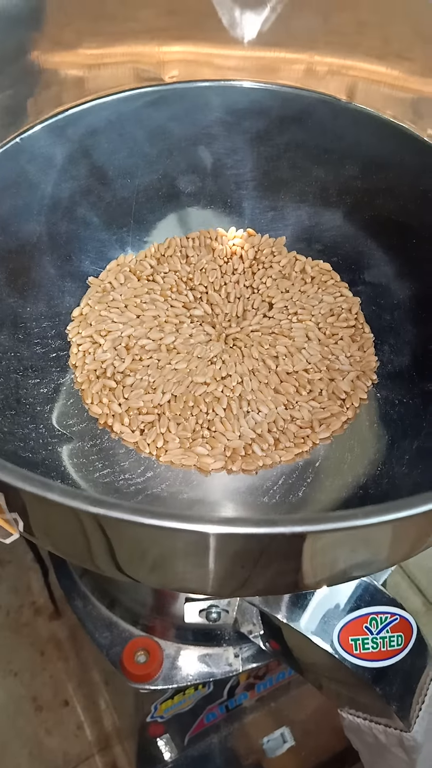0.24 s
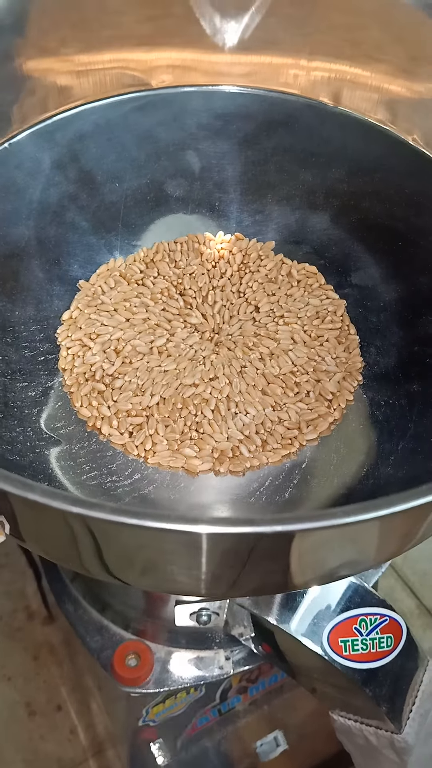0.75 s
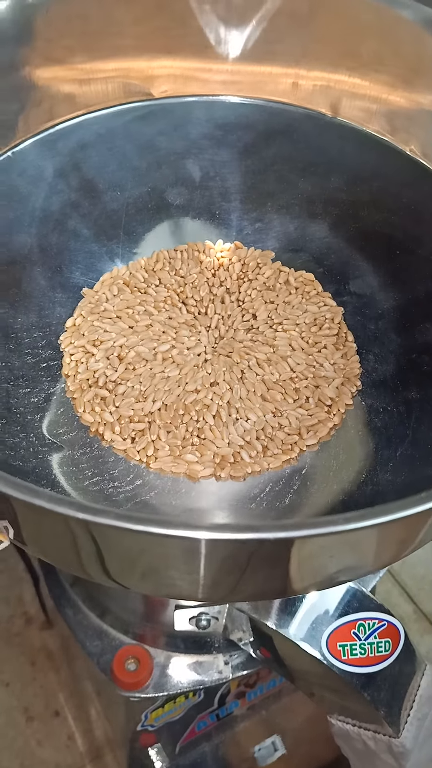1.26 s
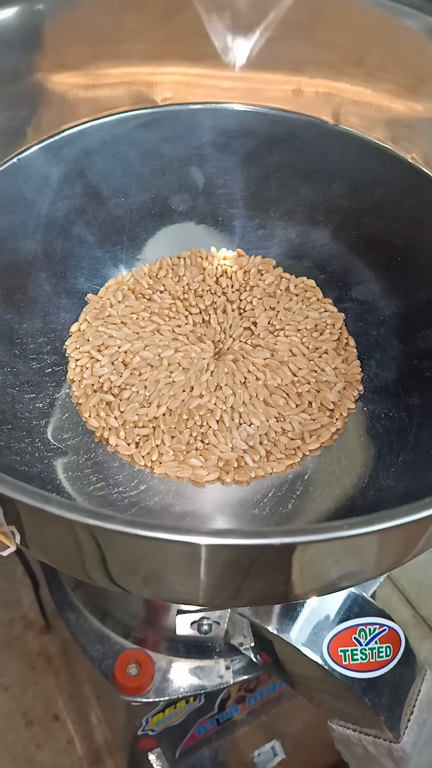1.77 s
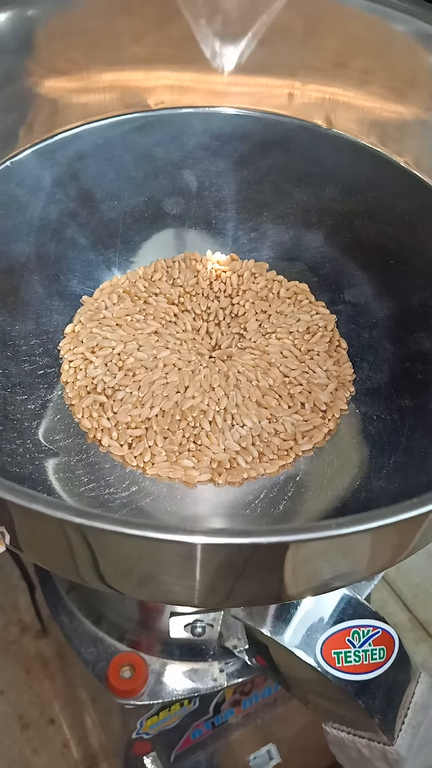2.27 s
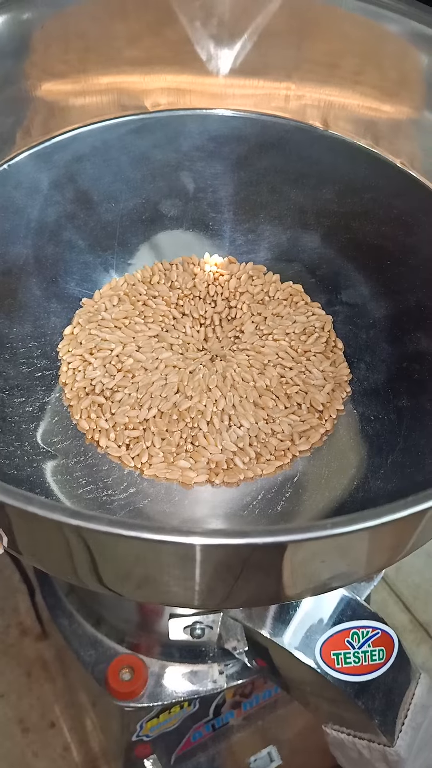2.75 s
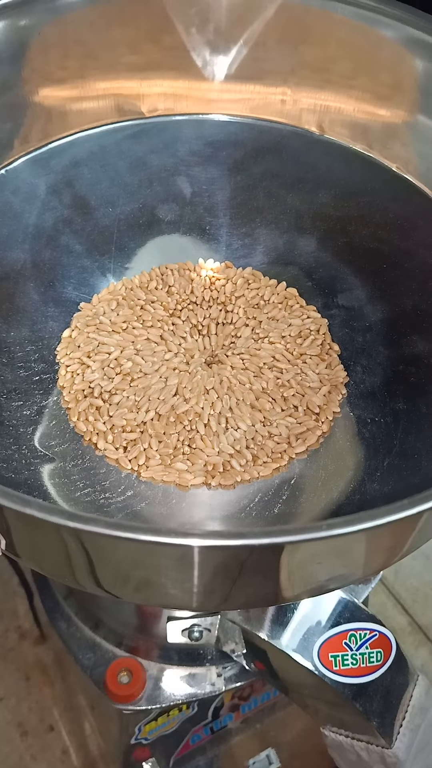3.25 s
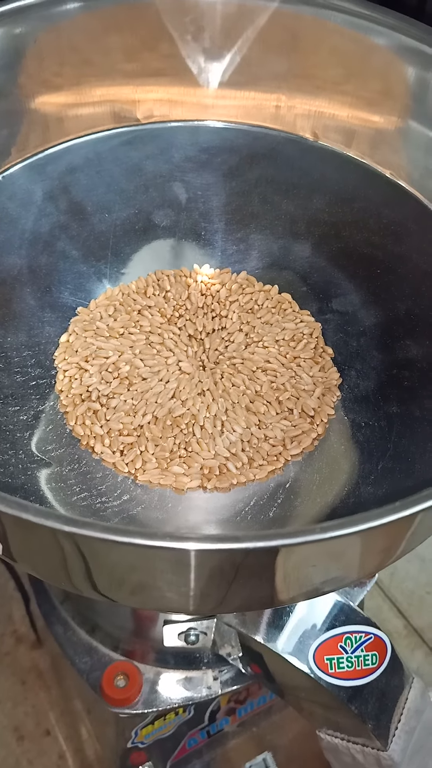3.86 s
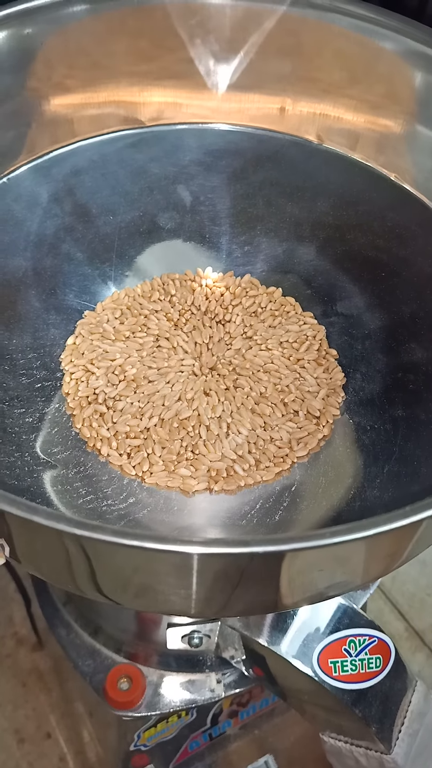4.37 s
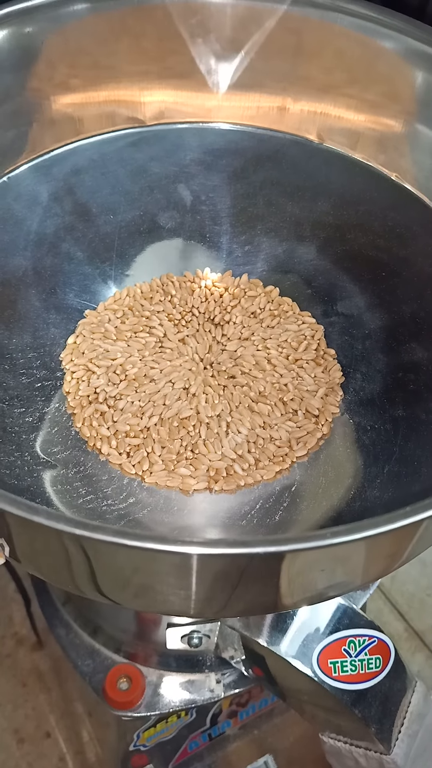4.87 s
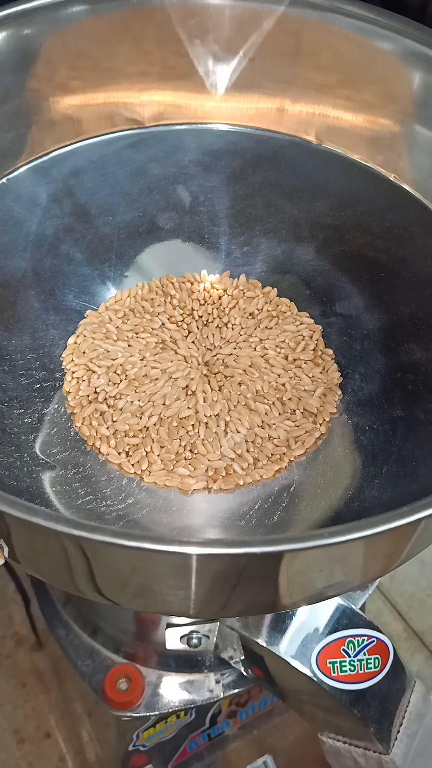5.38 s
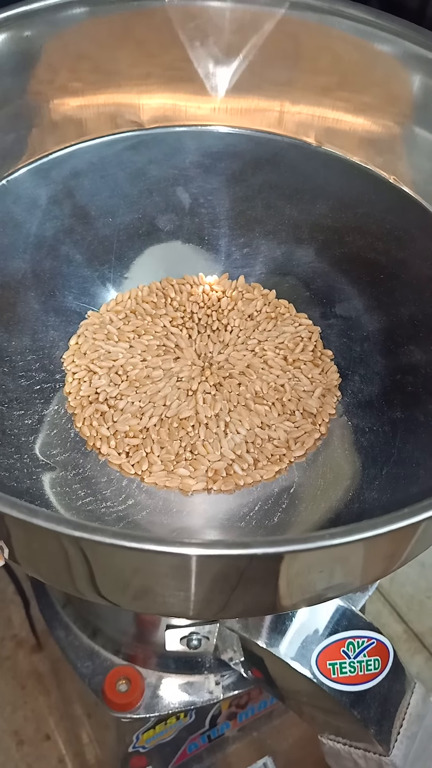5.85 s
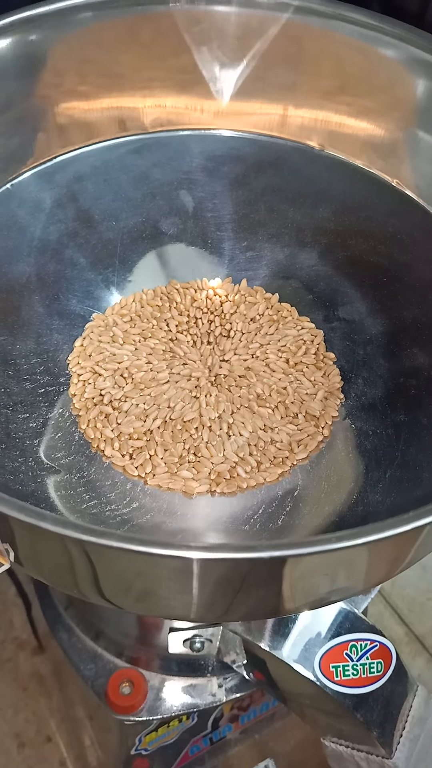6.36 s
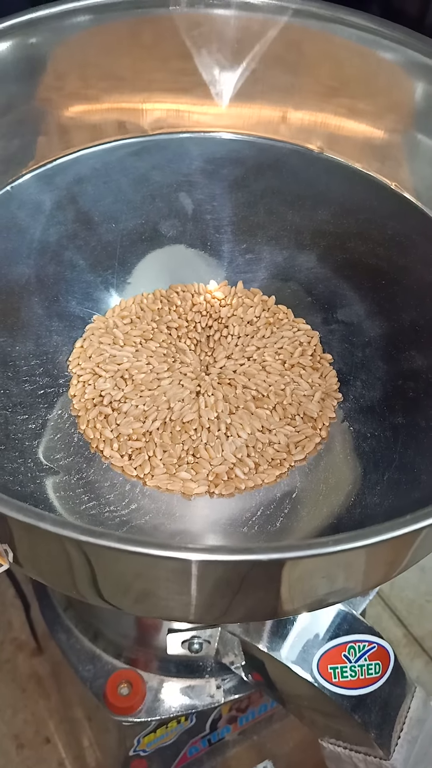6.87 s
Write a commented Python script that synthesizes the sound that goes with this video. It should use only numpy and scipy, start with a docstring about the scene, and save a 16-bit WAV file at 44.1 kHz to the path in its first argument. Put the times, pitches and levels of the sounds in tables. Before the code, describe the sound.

Continuous grinding of kernels in a small motorized flour mill, droning and hissing evenly with slight flutters and a few faint grainy ticks.

```python
"""Small electric grain mill indoors

A phone is held just over the steel hopper, and its two ports hear each resonance differently.
Kernels crush in a dense noise stream between the stones. The shaking excites resonances of the
grinding chamber (drone), the steel shell (whirr) and the hopper wall (hiss), over broad rubbing noise.
The grinding swells and dips briefly, the shell whines, and short grainy ticks sound in the hiss.
"""
import sys
import numpy as np
from scipy import signal
from scipy.fft import rfft, irfft, next_fast_len
from scipy.io import wavfile
from scipy.ndimage import uniform_filter1d, map_coordinates

SR = 44100
rng = np.random.default_rng(int(sys.argv[2]) if len(sys.argv) > 2 else 0)


def ratio_of_db(decibels):
    """Turn decibels (scalar or array-like) into linear amplitude factors; 0 dB maps to 1."""
    return 10 ** (np.asarray(decibels, float) / 20)


def put_to_file(sound):
    """Save the sound as 16-bit audio at rate SR, in the file named by the first command-line argument."""
    columns = np.atleast_2d(sound).T  # one column per channel
    safe = np.clip(columns, -1, 1)
    whole_steps = np.round(safe * 32767)
    wavfile.write(sys.argv[1], SR, whole_steps.astype(np.int16))


N = 314022  # samples

# resonances of the mill: pitch_hz, width_hz (between -6 dB points), left_db (relative power),
# right_minus_left_db, left_lead_rad
RESONANCES = [(294, 20, -53.5, 6.5, -1.5), (332.9, 22.2, -38, -1.5, -1.5), (379.6, 17, -42.5, -7, -2.5),
              (428.8, 13, -44, -10, -0.1), (450, 29, -38.5, -2.5, -2.5), (504.5, 41, -35.5, -4.5, -0.5),
              (558.8, 31, -32.5, -24, 1.07), (582.8, 28, -34.5, -4.5, -1.15), (607.6, 18, -42, -6, -1.5),
              (657, 33, -45, -13, -7.5), (798, 22, -51, -1, -3.5), (937, 35, -59.5, -1.5, 1.5),
              (1062, 28, -61, 3.5, 0.5), (1260, 43, -58.5, -0.5, 0.5), (1368, 64, -56, 3, 0),
              (1422, 30, -60.5, 0.5, -0.5), (1465, 26, -57, -3.5, -0.5), (1658, 49, -61.5, -10, -6),
              (1885, 36, -56, -2.5, 0.5), (2540, 50, -61, 2, -1.5), (2160, 80, -49, -2, 0.37),
              (2040, 110, -57.5, 2.5, 0), (2239, 60, -56.5, 2.5, -0.9), (2590, 62, -55.5, 1, -2.2),
              (2638, 24, -50.5, 12, 0.44), (2678, 30, -46.5, 0, 0.58), (2725, 40, -48, -3, .9),
              (2770, 60, -51.5, -6, 1.7), (3425, 60, -56, -2, 0), (3490, 45, -57, -6, 0),
              (3386, 46, -64.5, 7, 0.5), (3565, 60, -63.5, -1, -1), (3620, 50, -60, -0.5, -1.5),
              (3685, 40, -65.5, -1, -1.5), (4250, 150, -64, -3.5, 0), (4560, 440, -79, -3, 0),
              (5630, 180, -61.5, -9.5, 1), (6220, 410, -62, -7, -0.5), (7790, 400, -85, 8, 0.2)]
# broad rubbing noise under the resonances: pitch_hz, left_db (relative, per Hz), right_minus_left_db
RUBBING = [(78, -140, -0.5), (146, -102, 0), (196, -83.5, -5.5), (258, -71, -0.5), (404.4, -56, -10.5),
           (684, -74.5, 3.5), (765, -72.5, -0.5), (1344, -81, -3), (2070, -77, 5), (3240, -87.5, 6),
           (3980, -90.5, 1.5), (5240, -93, -4), (6520, -95, -1), (7050, -110, 6), (7800, -112, -9),
           (11000, -124, -4.5), (15500, -126, -1.5)]
# coherence of the two ports: pitch_hz, resonances_0_to_1, rubbing_0_to_1
COHERENCE = [(250, 0.98, 1), (630, 0.89, 0.99), (794, 1, 0), (2000, 0.75, 0.04), (3100, 0.89, 0.5),
             (4020, 0.98, 0.06), (6000, 0.5, 0), (7600, .3, 0), (8200, .3, 0.05)]
# how hard the stones are loaded, before each band's share: time_s, load_db
STONE_LOAD = [(0, 2.5), (.3, -0.56), (.9, -0.9), (1.5, 0.7), (2, 0.9), (2.7, -0.5), (3.1, 0.5), (3.6, -2.2),
              (4.3, 0.53), (5.1, 0), (5.6, -1.5), (6.1, -0.8), (6.5, -1.3), (6.85, -2), (7.12, -1.5)]
# brief changes of level, mostly swells, in the grinding noise: time_s, drone_db, whirr_db, hiss_db
BRIEF_SWELLS = [(.75, 1.5, 1.5, 2.7), (.898, 1, 1.9, 1.9), (1.0, 0, .8, 1.8), (1.098, -0.5, .1, 3),
                (1.291, 3, .1, 1.7), (1.851, 3, 1.3, .7), (1.936, 1.5, .1, 2.9), (2.16, 4.5, .1, 1.9),
                (2.345, 2.5, .1, 1.2), (2.43, -4, 2.3, .7), (2.719, 4.5, .8, 4.8), (2.76, 3, .3, 2),
                (2.81, 3.5, .7, 3), (2.89, 3.5, 0.091, 1.2), (3.18, 0.5, 3.5, 5), (4.18, .6, .1, 2.2),
                (4.32, 1.5, .1, 2.5), (4.455, 3, 0.82, 1.8), (4.88, 2.5, .9, 0.089), (5.203, 4.5, 1.7, 1.5),
                (5.322, 1.5, .1, 2.2), (5.832, 2, .1, 2.2), (6.489, 5.5, 0.55, 2.2), (6.59, 5, 3.8, .6)]
# brief changes of level, mostly dips, before each band's share: time_s, level_db, length_s
BRIEF_DIPS = [(0.059, -3, .06), (0.207, -1.5, .07), (0.813, -1.5, .06), (1.149, -3.5, 0.038),
              (1.231, -2.5, 0.046), (2.26, -1.5, 0.065), (2.945, -3.5, 0.097), (3.269, -2, .07),
              (4.54, -3, 0.066), (5.431, -1, 0.045), (5.772, 0.5, 0.034), (6.075, -1.5, 0.1),
              (6.71, -3, 0.1)]
# slow swelling of the shell's whine: time_s, swell_db
WHINE_SWELL = [(0, -4), (.75, -2), (.92, 2.5), (1.4, 4), (1.55, -0.5), (1.95, 1.5), (2.25, -2), (2.44, 0.5),
               (2.6, 0.5), (4.8, -0.4), (5.2, 0.3), (5.6, 0), (7.12, 1.5)]
# short grainy ticks in the hiss, some clear and some barely above the noise: start_s, level_db (relative)
HISS_TICKS = [(1.9343, -46.5), (2.6938, -46), (2.7137, -42.5), (2.8943, -45.5), (3.1752, -44),
              (5.2714, -46), (6.4906, -46.5)]

FFT_SIZE = next_fast_len(N)
HZ = np.maximum(np.arange(FFT_SIZE // 2 + 1) * SR / FFT_SIZE, 1)
SPLIT_HZ = (890, 3070, 8100)  # drone | whirr | hiss | faint air
PORT_LAG_S = 24 / SR  # delay from left port to right
LOW_LEAD_RAD, LOW_LEAD_HZ = 0.93, 670  # low rubbing reaches the right port earlier than the lag alone says
SHAFT_HZ, THROB_DB = 30.3, 0.6  # stone rotation, and its throb in the hiss
SWELL_RISE_S, SWELL_FALL_S = 0.02, 0.018
# how far drone, whirr and hiss follow the load and the dips
LOAD_SHARES, DIP_SHARES = (0.53, 0.42, 0.58), (1.1, 0.28, 0.7)
AIR_DRONE_SHARE, AIR_HISS_SHARE = 0.88, 0.5  # how far the faint air follows drone and hiss
WHINE_HZ, WHINE_WIDTH_HZ = 2617, 55
TICK_GAIN_DB, TICK_FADE_S = 68.5, 0.0097  # strength against the stream; time to fall to 1/e
ROOM_T60_S, ROOM_DB, ROOM_HZ = 0.095, -16, 920  # decay; echo energy before the low cut; low cut
PITCH_WAVER = 0.0015  # typical share by which the pitches drift
LEVEL_DB = -28.5  # rms of the dry mix over both ports, re full scale


def column(table, index):
    """Interpolation: one table column at every frequency, along a logarithmic frequency axis."""
    table = np.array(table, float)
    return np.interp(np.log(HZ), np.log(table[:, 0]), table[:, index])


def causal(power):
    """Minimum phase: folding the cepstrum gives a response that rings only after it is struck."""
    cepstrum = irfft(np.log(power + 1e-30) / 2)
    half = len(cepstrum) // 2
    cepstrum[1:half] *= 2
    cepstrum[half + 1:] = 0
    return np.exp(rfft(cepstrum))


def walk(rate):
    """Smoothed random process: levels held 1 / rate s and averaged twice, with unit spread."""
    hold = int(SR / rate)
    levels = np.repeat(rng.standard_normal(N // hold + 1), hold)
    smooth = uniform_filter1d(uniform_filter1d(levels, hold), hold)[:N]
    return smooth / smooth.std()


def bumps(t, times, heights_db, rise_s, fall_s):
    """Gaussian envelopes: brief swells or dips in dB around each time."""
    out = np.zeros(N)
    for at, db, rise, fall in np.broadcast(times, heights_db, rise_s, fall_s):
        out += db * np.exp(-((t - at) / np.where(t < at, rise, fall)) ** 2)
    return out


def ports(force, left, right, lead, coherence):
    """Partial coherence: the right port hears the left's stream later, mixed with an unrelated one."""
    coherence = np.clip(coherence, 0, 1)
    late = force[0] * np.exp(-1j * (2 * np.pi * HZ * PORT_LAG_S + lead))
    mixed = coherence * late + np.sqrt(1 - coherence ** 2) * force[1]
    response = causal(left)
    return np.array([response * force[0], response * np.sqrt(right / left) * mixed])


def crushing(crack_db, scatter_db):
    """Shot noise: cracks of uneven size swell two unrelated streams of steady rubbing noise."""
    struck = rng.random(N) < 400 / SR  # about 400 cracks a second
    size = ratio_of_db(crack_db + scatter_db * rng.standard_normal(N)) * struck
    crack_power = uniform_filter1d(size ** 2, size=60) * 20
    stream = rng.standard_normal((2, N)) * np.sqrt(1 + crack_power)
    return stream / stream.std()


def loudness(t):
    """Superposed level contours: load, dips and swells add in dB for drone, whirr and hiss."""
    load_db = np.interp(t, *np.transpose(STONE_LOAD))
    dip_at, depth_db, length = np.transpose(BRIEF_DIPS)
    dip_db = bumps(t, dip_at, depth_db, length / 2, length / 2)
    swell_at, *swell_parts_db = np.transpose(BRIEF_SWELLS)
    parts_db = []
    for load_share, dip_share, swell_db in zip(LOAD_SHARES, DIP_SHARES, swell_parts_db):
        swells = bumps(t, swell_at, swell_db, SWELL_RISE_S, SWELL_FALL_S)
        parts_db.append(load_share * load_db + dip_share * dip_db + swells)
    return parts_db


def shaking():
    """Band-wise excitation: spectra of the force on the mill, each band with its own level and flicker."""
    t = np.arange(N) / SR
    feed = walk(9)  # kernels drop in unevenly; all parts feel it
    turn = np.cos(2 * np.pi * SHAFT_HZ * t + 0.56 * walk(1.2))  # the stones press harder once a turn
    drone_flicker_db = 0.23 * feed
    whirr_flicker_db = 0.65 * feed + 0.23 * walk(8.9)
    hiss_flicker_db = 0.74 * feed + 0.65 * walk(13) + THROB_DB * turn
    flicker_db = (drone_flicker_db, whirr_flicker_db, hiss_flicker_db)

    below = [1 / (1 + (HZ / hz) ** 12) for hz in SPLIT_HZ]
    bands = (below[0], below[1] - below[0], below[2] - below[1])  # shares of power
    parts_db = loudness(t)
    air_db = AIR_DRONE_SHARE * parts_db[0] + AIR_HISS_SHARE * parts_db[2] + 0.5 * feed
    air = ratio_of_db(air_db) * rng.standard_normal((2, N))
    force = np.sqrt(1 - below[2]) * rfft(air, FFT_SIZE)
    for db, more_db, band, crack_db in zip(parts_db, flicker_db, bands, (-9.0, -6.0, -1.5)):
        gain = ratio_of_db(db - db.mean() + more_db)
        stream = gain * crushing(crack_db, scatter_db=4.0)
        force = force + np.sqrt(band) * rfft(stream, FFT_SIZE)
    return force + np.sqrt(bands[2]) * ticks()


def whine(force):
    """Narrow-band amplitude modulation: the force near the whine's pitch swells slowly and wavers."""
    swell_db = np.interp(np.arange(N) / SR, *np.transpose(WHINE_SWELL)) + 1.2 * walk(11)
    in_time = irfft(force, FFT_SIZE)[:, :N]
    swollen = rfft(ratio_of_db(swell_db) * in_time, FFT_SIZE)
    near = 1 / (1 + (2 * (HZ - WHINE_HZ) / WHINE_WIDTH_HZ) ** 4)
    return near * swollen + (1 - near) * force


def ringing():
    """Modal superposition: steep resonances add in power; the strongest near each pitch sets the lead."""
    hz, width, left_db, more_db, lead = np.array(RESONANCES, float).T[:, :, None]
    bell = 1 / width / (1 + (2 * (HZ - hz) / width) ** 2) ** 2
    left = ratio_of_db(2 * left_db) * bell  # doubled dB gives power
    right = ratio_of_db(2 * (left_db + more_db)) * bell
    mean_lead = np.angle((np.sqrt(left * right) * np.exp(1j * lead)).sum(axis=0))
    coherence = column(COHERENCE, index=1)
    return ports(whine(shaking()), left.sum(axis=0), right.sum(axis=0), mean_lead, coherence)


def rubbing():
    """Friction noise: flour and kernels give a broad spectrum under the resonances."""
    left_db = column(RUBBING, index=1)
    right_db = left_db + column(RUBBING, index=2)
    lead = -LOW_LEAD_RAD / (1 + (HZ / LOW_LEAD_HZ) ** 6)
    return ports(shaking(), ratio_of_db(2 * left_db), ratio_of_db(2 * right_db), lead, column(COHERENCE, index=2))


def room():
    """Diffuse reflection: dense echoes off bowl and near walls, unlike at each port, ripple the upper range."""
    t = np.arange(int(0.2 * SR)) / SR
    echoes = rng.standard_normal((2, len(t))) * ratio_of_db(-60 * t / ROOM_T60_S) * (t > 0.002)
    echoes *= ratio_of_db(ROOM_DB) / np.sqrt((echoes ** 2).sum(axis=1, keepdims=True))
    return 1 + rfft(echoes, FFT_SIZE) / (1 + (ROOM_HZ / HZ) ** 4)


def ticks():
    """Impulsive excitation: sudden, grainy noise bursts decay exponentially."""
    push = np.zeros(N)
    t = np.arange(2000) / SR
    for at, db in HISS_TICKS:
        grit = rng.standard_normal(len(t)) ** 3 / 4  # cubing makes it grainy
        pulse = np.exp(-t / TICK_FADE_S) * grit
        start = int(at * SR)
        push[start:start + len(t)] += ratio_of_db(db + TICK_GAIN_DB) * pulse * np.sqrt(2 / (TICK_FADE_S * SR))
    return rfft(push, FFT_SIZE)


def scene():
    """Linear superposition: ringing and rubbing pass through the room; a warped time axis bends the pitch."""
    mill = irfft((ringing() + rubbing()) * room(), FFT_SIZE)[:, :N]
    drift = np.cumsum(PITCH_WAVER * walk(5))
    place = np.arange(N) + drift - uniform_filter1d(drift, size=SR)
    mill = np.array([map_coordinates(port, [place], mode="mirror") for port in mill])
    return mill * ratio_of_db(LEVEL_DB) / mill.std()


def low_pass(x):
    """Removes everything above the highest recorded frequency."""
    return signal.sosfilt(signal.butter(12, 15500, fs=SR, output="sos"), x)


def record(dry):
    """High-pass filtering: the phone cuts the lowest bass, below 95 Hz."""
    high_pass = signal.butter(N=2, Wn=95, btype="high", fs=SR, output="sos")
    thin = signal.sosfilt(high_pass, dry)
    return low_pass(thin)


dry = scene()
out = record(dry)
put_to_file(out)
```